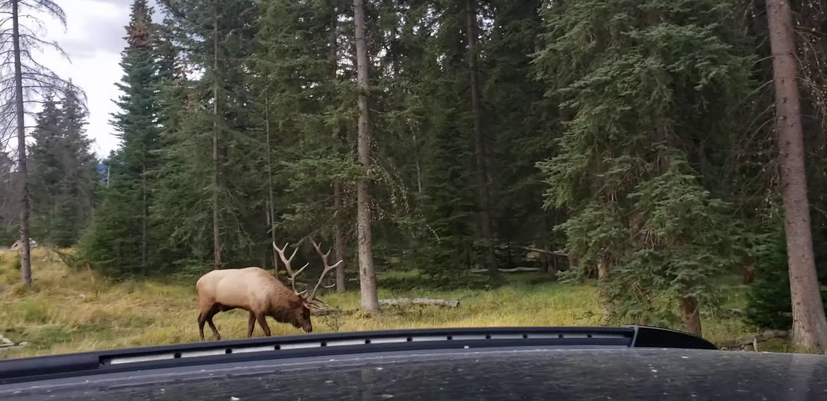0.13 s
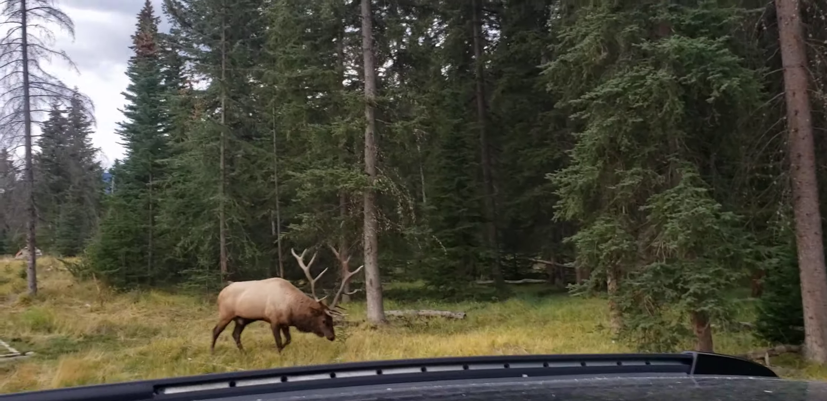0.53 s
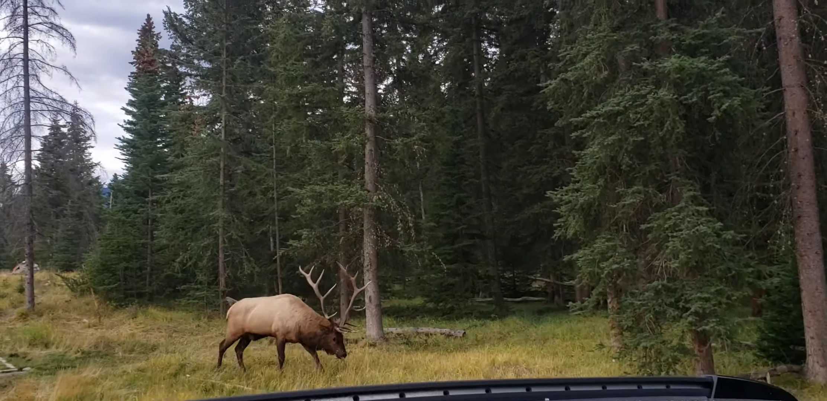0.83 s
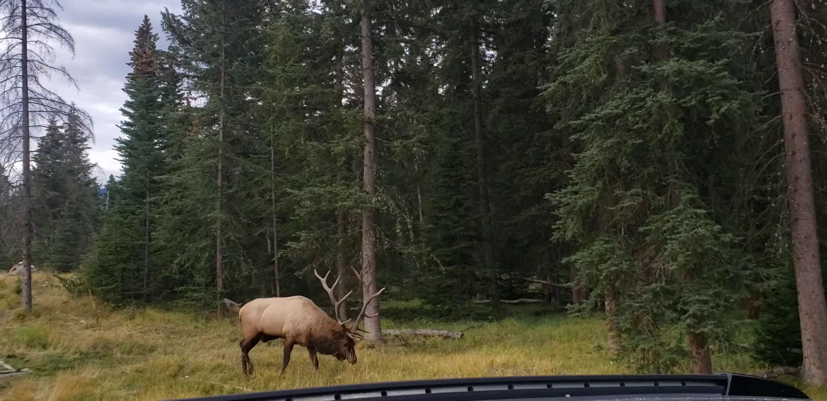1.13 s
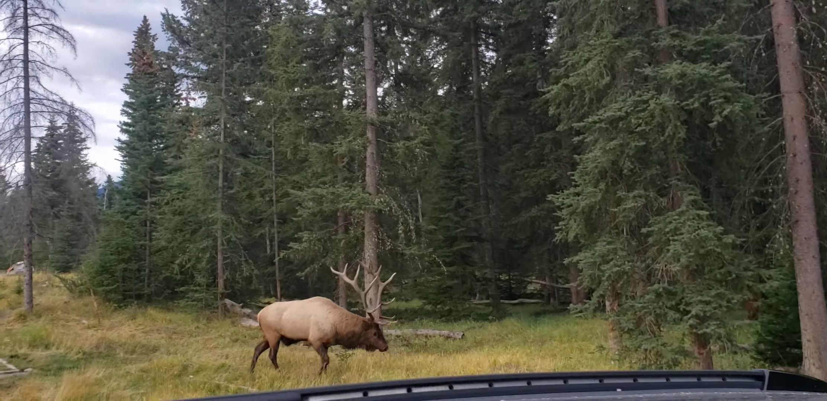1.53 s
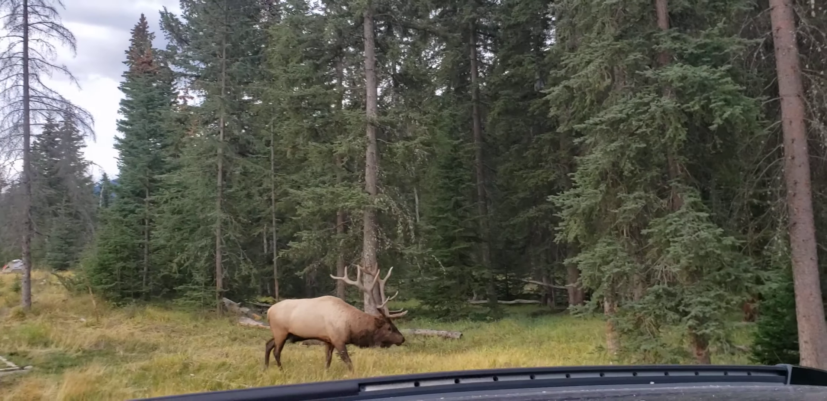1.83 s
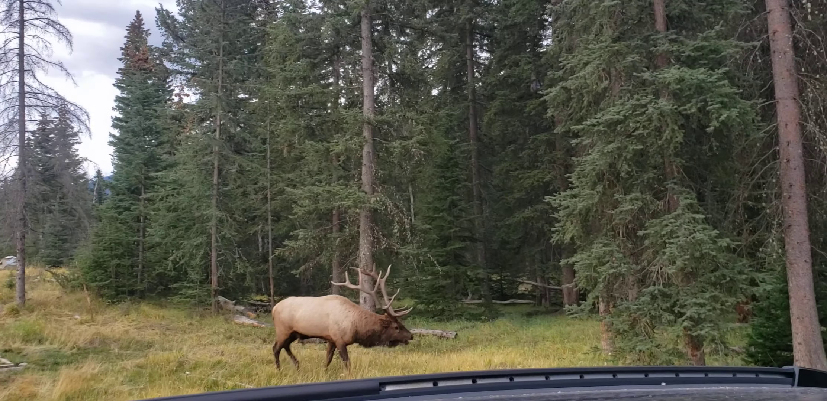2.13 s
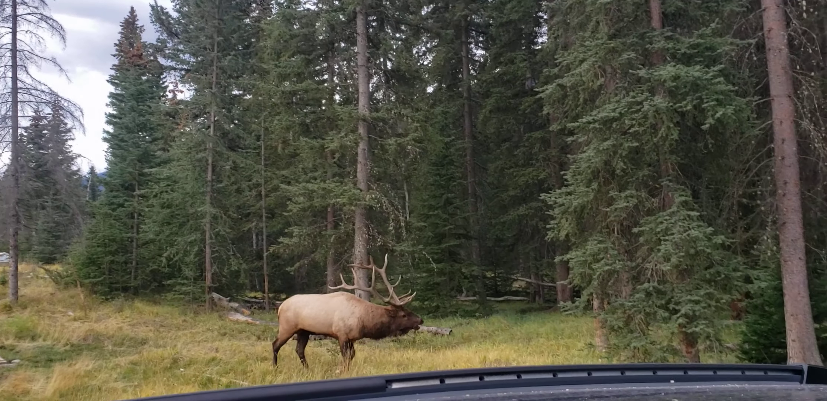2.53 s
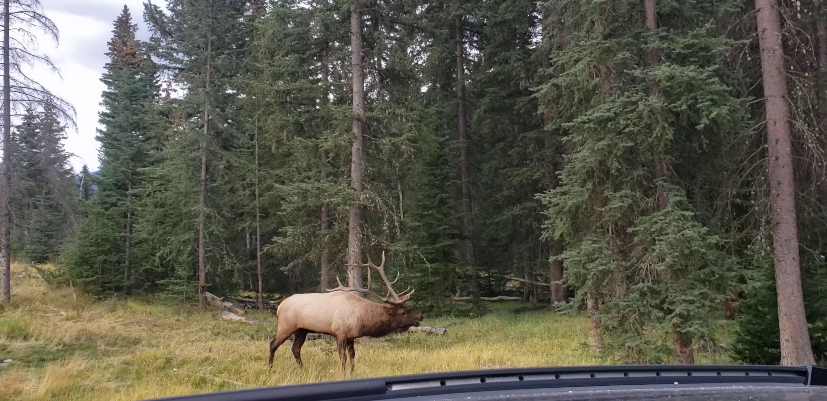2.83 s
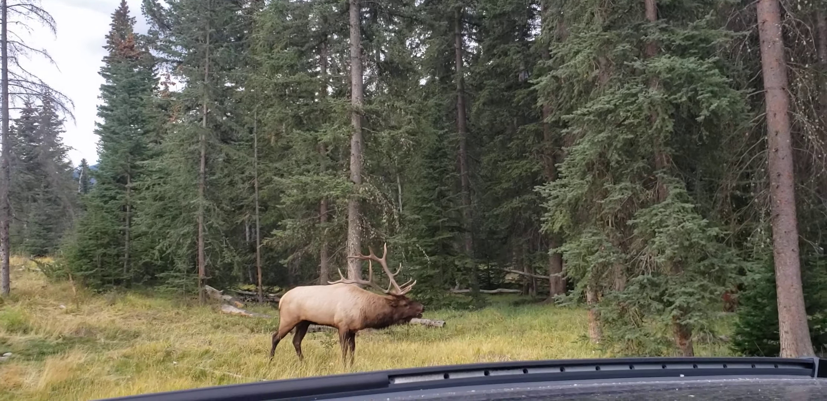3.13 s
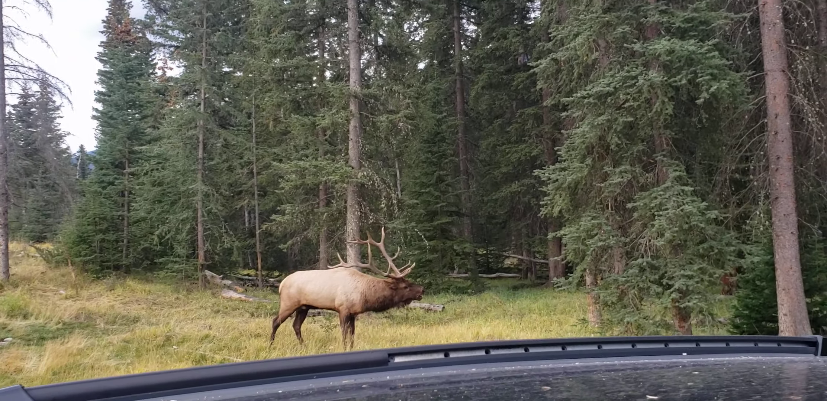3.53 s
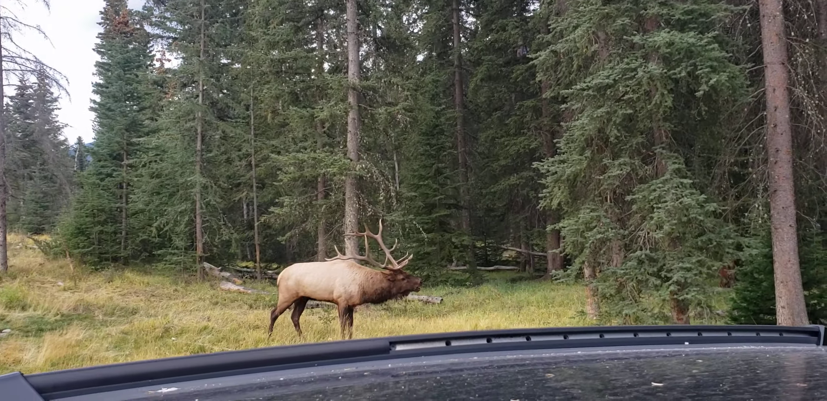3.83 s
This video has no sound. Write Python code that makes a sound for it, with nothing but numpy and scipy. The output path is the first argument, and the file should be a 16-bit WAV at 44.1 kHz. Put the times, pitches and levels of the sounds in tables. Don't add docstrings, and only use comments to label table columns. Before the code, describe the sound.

A bull elk bugles in a forest clearing, heard from an idling car on a handheld phone. Low engine drone and faint forest hush run throughout. Wind thumps come at 0.1-0.4 s, a sharp tap on the phone at 0.57, grassy rustles and clicks until 2.6. From 2.05 a hoarse whistle climbs in steps, cracks at 2.7 into a loud, rapidly pulsing shrill roar with tree echo, and clears to whistle near 4.

```python
import sys
import numpy as np
from scipy import signal
from scipy.io import wavfile
from scipy.ndimage import uniform_filter1d

SR = 44100
rng = np.random.default_rng(int(sys.argv[2]) if len(sys.argv) > 2 else 0)


def to_linear_factor(level_db):
    exponent = np.asarray(level_db, float) / 20
    return 10 ** exponent


def file_out(sig):
    cols = np.atleast_2d(sig).T
    lim = np.clip(cols, -1, 1)
    pcm = np.round(lim * 32767).astype(np.int16)
    wavfile.write(sys.argv[1], SR, pcm)


N = 176400
ELK_PAN_DB, ELK_LAG_S = 1.5, .00004


def level(x, db=0):
    return x * to_linear_factor(db) / np.sqrt(np.mean(x ** 2))


def peak(x):
    return x / np.max(np.abs(x))


def curve(table, col):
    a = np.array(table, float)
    return np.interp(np.arange(N) / SR, a[:, 0], a[:, col])


def inside(table, fade=.006):
    t = np.arange(N) / SR
    return np.clip(np.minimum(t - table[0][0], table[-1][0] + fade - t) / fade, 0, 1)


def band(x, hz, width_hz, order=1):
    edges = np.clip([hz - width_hz / 2, hz + width_hz / 2], 10, .49 * SR)
    return signal.sosfilt(signal.butter(order, edges, "band", fs=SR, output="sos"), x)


def body(x, table, order=1):
    return sum((-1) ** k * to_linear_factor(db) * band(x, hz, w, order=order) for k, (hz, w, db) in enumerate(table))


def walk(rate):
    k = max(int(SR / rate), 2)
    return level(uniform_filter1d(uniform_filter1d(rng.standard_normal(N), k), k))


def pair(x, pan_db, lag_s):
    late = np.interp(np.arange(N) - lag_s * SR, np.arange(N), x)
    return np.array([x * to_linear_factor(pan_db / 2), late * to_linear_factor(-pan_db / 2)])


def pipe(hz, overtones_db, blur=0):
    phase = 2 * np.pi * np.cumsum(hz) / SR
    overtones = sum(to_linear_factor(db) * np.sin((k + 2) * phase + blur) for k, db in enumerate(overtones_db))
    return np.sqrt(2) * np.sin(phase), overtones


# (t/s, level/dB)
HISS_DB = [(0, -77), (.14, -84), (.18, -67), (.21, -81), (.52, -83), (.62, -81), (1.11, -85), (1.31, -78.5),
           (1.36, -81.5), (2.5, -84.5), (2.57, -76), (2.78, -83), (2.83, -84), (4, -82.5)]


def hiss():
    n = rng.standard_normal((2, N))
    colour = band(n, 12600, 5000, order=2) + 0.39 * band(n, 11000, 9000)
    return level(colour) * to_linear_factor(curve(HISS_DB, 1) + 1.5 * walk(30))


# (f/Hz, level/dB per Hz)
HUSH = [(200, 2), (600, 5), (1000, 6), (1600, -7.5), (2400, -18.5), (3200, -49), (7000, -28), (8500, -48)]


def hush():
    out, swell, a = 0, walk(1.0), np.array(HUSH)
    for hz in 200 * 2 ** np.arange(0, 5.4, .4):
        shared, own = rng.standard_normal(N), rng.standard_normal((2, N))
        mix = pair(shared, 3.2, -.00043) + min(0.6 + hz / 2500.0, 3) * own
        density_db = np.interp(np.log(hz), np.log(a[:, 0]), a[:, 1])
        db = density_db + 10 * np.log10(hz) + 0.13 * swell + 3.0 * walk(30)
        out = out + to_linear_factor(db) * level(band(mix, hz, hz * 0.34, order=2))
    return level(out, -54.5)


# (f/Hz, width/Hz, level/dB)
RUMBLE = [(49, 14.85, 1), (74.6, 31, -2.5), (103, 10.4, -1.5), (154, 37, -20)]
# (t/s, level/dB)
RUMBLE_DB = [(0, -45), (.44, -44), (.5, -49), (.92, -53), (1.5, -52), (2.3, -50.5), (3.15, -49.5),
             (4, -52.5)]


def rumble():
    mid, side = (body(rng.standard_normal(N), RUMBLE) for _ in range(2))
    both = pair(mid, 1.0, 0) + .6 * side * np.array([[1], [-1]])
    return level(both) * to_linear_factor(curve(RUMBLE_DB, 1) + 5.0 + 0.62 * walk(36))


# (t/s, grass level/dB, cloth level/dB)
RUSTLE = [(0, -43, -58), (.12, -65, -83.5), (.3, -55.5, -72), (.47, -73, -79.5), (.62, -64, -69.5),
          (.8, -63.5, -72), (.95, -83, -93), (1.3, -86, -84.5), (1.4, -52, -78), (1.5, -62, -80),
          (1.75, -54.5, -73), (1.85, -64.5, -90), (2.08, -74, -92), (2.16, -62.5, -79), (2.75, -54.5, -78)]


def rustle():
    grain_size = to_linear_factor(np.minimum(5.2 * rng.exponential(size=N), 10))
    grains = rng.standard_normal((2, N)) * grain_size * (rng.random(N) < .08)
    grass = band(grains + 0.11 * grains[::-1], 1200, 940, order=2)
    rubbing = rng.standard_normal((2, N)) * to_linear_factor(2.0 * walk(40))
    cloth = band(rubbing, 4450, 1500, order=2) + 0.5 * band(rubbing, 6900, 1300, order=2)
    both = level(grass) * to_linear_factor(curve(RUSTLE, 1)) + level(cloth) * to_linear_factor(curve(RUSTLE, 2))
    return both * inside(RUSTLE, fade=0.057)


# (t/s, peak level/dB, f/Hz)
THUMPS = [
    (.13, -37, 54),
    (0.195, -35.5, 90),
    (0.286, -36, 57),
    (0.338, -38, 68),
    (0.392, -30, 103),
    (0.425, -33, 62.4),
]


def thumps():
    out, t = np.zeros((2, N + 4410)), np.arange(4410) / SR
    for s, db, hz in THUMPS:
        u = (t - .05) * hz
        swing = 1.98 * np.sin(2 * np.pi * u) * np.exp(-(u / 0.37) ** 2)
        out[:, int((s - .05) * SR):][:, :len(t)] -= to_linear_factor(db) * swing * to_linear_factor([[5.5], [-9]])
    return out[:, :N]


# (t/s, peak level/dB, ring f/Hz,
# crackle level/dB re ring)
CLICKS = [(0.254, -44, 1160, -14), (0.349, -38, 1140, -15), (0.5738, -39.5, 1780, -22),
          (.579, -56, 1700, -10), (0.5943, -43, 1460, -26), (.76, -51, 1640, -20),
          (0.789, -47.5, 1550, -16), (1.278, -45, 880, -28), (1.39, -34.5, 1140, -23),
          (1.415, -39.5, 1250, -21), (1.444, -42.5, 1280, -11), (1.544, -42, 1220, -11),
          (1.638, -36.5, 1230, -11), (1.667, -40.5, 1240, -9), (1.706, -39, 1340, -29),
          (1.765, -35.5, 1190, -20), (2.153, -43, 696, -10), (2.326, -40, 750, -30),
          (2.597, -36.5, 940, -21), (2.63, -43, 1100, -38)]


def clicks():
    out, t = np.zeros((2, N + 4410)), np.arange(4410) / SR
    noises = rng.standard_normal((len(CLICKS), len(t)))
    for (s, db, hz, top_db), noise in zip(CLICKS, noises):
        burst = (noise + 12 * (t == 0)) * to_linear_factor(-60 * t / 0.019)
        ring = peak(band(burst, hz, 620, order=2))
        crackle = peak(band(burst, 4200, 3400, order=2))
        click = ring + to_linear_factor(top_db) * crackle
        out[:, int(s * SR):][:, :len(t)] += to_linear_factor(db) * click * to_linear_factor([[2.2], [-2.2]])
    return out[:, :N]


# (f/Hz, width/Hz, level/dB, t60/s)
SNAP = [(194, 150, -11.5, 0.025), (463, 630, 1, 0.024), (1700, 630, -1.5, 0.026), (4180, 940, -4.5, 0.015),
        (10900, 5000, -38, 0.022)]


def snap():
    snap_s, snap_db = .5722, -23
    t = np.arange(N) / SR - snap_s
    hit = (np.arange(N) == int(snap_s * SR)) * 45 + rng.standard_normal(N) * (t > 0)
    sound = 0
    for hz, width, db, t60 in SNAP:
        ring = band(hit * to_linear_factor(-60 * np.abs(t) / t60), hz, width, order=2)
        sound = sound + peak(ring) * to_linear_factor(db)
    return to_linear_factor(snap_db) * peak(sound) * to_linear_factor([[-.7], [.7]])


def echo(x):
    echo_db, t60_s, own_share = -7, .32, .9
    t = np.arange(int(.4 * SR)) / SR
    tails = rng.standard_normal(len(t)) + own_share * rng.standard_normal((2, len(t)))
    tails = tails * to_linear_factor([[ELK_PAN_DB / 2], [-ELK_PAN_DB / 2]])
    tails = tails * to_linear_factor(-60 * t / t60_s) * (t > .008)
    tails = tails / np.sqrt(np.sum(tails[0] ** 2))
    return to_linear_factor(echo_db) * signal.fftconvolve(x[None], tails, axes=1)[:, :N]


# (t/s, f/Hz, level/dB, overtone level/dB)
START = [(2.05, 757, -72, -78), (2.075, 702.6, -56, -70), (2.114, 751, -49.5, -72),
         (2.148, 834, -62.5, -60), (2.2, 973, -46.5, -63), (2.245, 1051, -36.5, -68),
         (2.258, 1020, -39.5, -60), (2.268, 1170, -75, -65.5)]
CLIMB = [(2.269, 1200, -67, -64), (2.299, 1266, -50, -63), (2.319, 1370, -56, -59),
         (2.345, 1542, -49.5, -64), (2.364, 1593, -39, -62.5), (2.407, 1811, -46.5, -67.5),
         (2.437, 1805, -47, -69)]
HOLD = [(2.435, 1760, -50.5, -74), (2.463, 1678, -35.5, -66.5), (2.5, 1760, -38.5, -69),
        (2.542, 1813, -36.5, -69.5), (2.575, 1904, -46, -72), (2.632, 1997, -43, -67),
        (2.69, 2043, -42, -51), (2.711, 2100, -40, -52), (2.722, 2240, -71, -68)]
CLOSE = [
    (3.963, 2173, -44, -62),
    (3.985, 2169, -26.5, -44),
    (4.0, 2150, -27.5, -44),
]
OVERTONES_DB = [6.5, -16.5, -19]
# (f/Hz, width/Hz, level/dB)
MOUTH = [(2500, 830, -3), (4055, 1100, -9), (6050, 500, 9), (7050, 810, 8)]
# (f/Hz, width/Hz, level/dB)
LINGER = [(735, 16, -8), (1035, 24, -12), (1270, 9, 8), (1590, 18, -3), (1740, 22, -12)]
# (t/s, f/Hz, level/dB)
MOAN = [(2.09, 688, -62), (2.15, 597, -56), (2.22, 548, -57), (2.26, 558, -70)]
# (t/s, level/dB)
CRACK = [
    (2.712, -74),
    (2.74, -64.5),
    (2.79, -58.5),
    (2.815, -72.5),
]
# (f/Hz, width/Hz, level/dB)
CRACK_BANDS = [(2840, 440, -1.5), (4300, 1300, -1.5), (6600, 800, -2.5)]


def whistle():
    out, over = 0, 0
    for part in (START, CLIMB, HOLD, CLOSE):
        unsteady = 1 + .006 * walk(120) + .005 * walk(430)
        hz = uniform_filter1d(curve(part, 1), size=300) * unsteady
        tone, upper = pipe(hz, OVERTONES_DB, blur=1.1 * walk(250))
        out = out + tone * to_linear_factor(curve(part, 2) + 2.0 * walk(42)) * inside(part, fade=0.0036)
        over = over + upper * to_linear_factor(curve(part, 3) + 3.75 * walk(90)) * inside(part, fade=.01)
    moan, _ = pipe(curve(MOAN, 1) * (1 + 0.0835 * walk(185)), [-20])
    moan = moan * to_linear_factor(curve(MOAN, 2) + 3.0 * walk(60)) * inside(MOAN)
    crack = level(body(rng.standard_normal(N), CRACK_BANDS, order=2))
    crack = crack * to_linear_factor(curve(CRACK, 1)) * inside(CRACK)
    return out + body(out, LINGER) + body(over, MOUTH, order=2) + moan + crack


# (t/s, growl f/Hz, swept whistle level/dB, chest level/dB, sweep centre f/Hz, sweep width/Hz, roughness 0-1)
ROAR = [(2.712, 95.5, -31.5, -64, 2314, 499.6, .9), (2.735, 94.1, -47.5, -69, 2134, 675, 0.7),
        (2.755, 90, -35.5, -55, 1700, 453, .45), (2.85, 82.53, -32, -44, 1836, 895, 0.14),
        (3.11, 80.7, -30.5, -39.5, 1890, 1101, 0.17), (3.4, 83.52, -29, -39, 1973, 1102, .16),
        (3.7, 84.34, -28, -42.5, 2040, 1115, 0.1), (3.77, 87.97, -31, -47.5, 1974, 1200, 0.34),
        (3.83, 89.7, -31, -40, 2016, 1418, .25), (3.955, 89.13, -32.5, -44, 2116, 1923, .35),
        (3.985, 88.5, -35.5, -54, 2142, 598, 0.2)]
ROAR_OVERTONES_DB = [-3, -2.5, 0]
# (f/Hz, width/Hz, level/dB, left minus right/dB)
THROAT = [(1397.6, 41.6, 2, 7.5), (1730, 67, -0.5, 6.5), (2102, 101, 0, 1.5), (2427, 110, -4, -4.5),
          (2678, 29, -10, -5), (2930, 75, -13, 4)]
# (f/Hz, width/Hz, level/dB)
UPPER_THROAT = [(3754, 150, -23), (5750, 420, -36), (6360, 580, -48), (7360, 600, -40), (3370, 500, -41.5)]
# (f/Hz, width/Hz, level/dB)
EDGES = [(1130, 92, 7), (2710, 200, -5.5), (2975, 95, -8)]
# (t/s, level/dB)
OPENING = [(2.72, -17), (2.78, -8.5), (2.83, -30.5), (3.76, -33.5), (3.84, -15), (3.95, -10.5),
           (3.98, -18.5)]
# (t/s, level/dB)
RIDGE = [(2.75, -22), (3.1, -20), (3.4, -18.5), (3.8, -19), (3.9, -25.5), (4, -33)]
# (f/Hz, width/Hz, level/dB)
CHEST = [(90, 23, -1), (159, 41, -0.5), (270, 83, -9.5), (412, 110, -7.5), (533.6, 87, -3.5),
         (636.5, 70.7, 2.5), (918, 94, -3)]
# (t/s, level/dB)
DEEP = [(2.7, -4.5), (3.3, -2.5), (3.5, 4), (3.75, 8.5), (3.85, 2.5)]


def roar():
    open_share = .72
    rough, on = np.clip(curve(ROAR, 6), 0, 1), inside(ROAR, fade=.02)
    cycles = np.cumsum(curve(ROAR, 1) * (1 + 0.095 * rough * walk(60))) / SR
    phase, index = cycles % 1, cycles.astype(int)
    chance = rng.standard_normal((N // 100, 2))[index].T
    sweep = phase / open_share - .5 + .2 * rough * chance[0] + .15 * rough * walk(500)
    hz = curve(ROAR, 4) + curve(ROAR, 5) * sweep
    gate = np.sin(np.pi * np.clip(phase / open_share, 0, 1) ** 0.76) + 0.15 + .9 * rough
    size = to_linear_factor(3.5 * rough * chance[1])
    tone, upper = pipe(uniform_filter1d(hz, size=40), ROAR_OVERTONES_DB)
    breath = to_linear_factor(-26) * (3 + 12 * rough ** 2) * rng.standard_normal(N)

    voiced = (tone + breath) * gate * size
    steep = band(voiced, 2200, 2100, order=2)
    low = 0
    for k, (f, w, db, pan_db) in enumerate(THROAT):
        low = low + (-1) ** k * to_linear_factor(db) * pair(band(steep, f, w), pan_db, ELK_LAG_S)
    low = low + to_linear_factor(curve(OPENING, 1)) * pair(body(voiced, EDGES, order=2), ELK_PAN_DB, ELK_LAG_S)

    bright = (upper + breath) * gate * size
    ridge = to_linear_factor(curve(RIDGE, 1)) * band(bright, 4217, 267, order=2)
    high = body(bright, UPPER_THROAT, order=2) - ridge

    noise = to_linear_factor(-62.0) * rough * rng.standard_normal(N) * np.exp(-phase / .4)
    pulses = np.diff(index, prepend=0) * size + noise
    chest = -to_linear_factor(curve(DEEP, 1)) * body(pulses, CHEST[:3])
    for k, row in enumerate(CHEST[3:]):
        unsteady = to_linear_factor(1.0 * walk(8.9) + 2.1 * walk(40))
        chest = chest + (-1) ** k * body(pulses, [row], order=2) * unsteady
    chest = band(chest, 632, 1154, order=2)

    def rms(v):
        return np.sqrt(np.mean((v * on) ** 2) / np.mean(on ** 2))

    gain = on * to_linear_factor(curve(ROAR, 2)) / rms(low)
    brighten_db = 6.0 + 0.0349 * (curve(ROAR, 4) - 1938.5)
    return low * gain, on * chest / rms(chest) * to_linear_factor(curve(ROAR, 3)), high * gain * to_linear_factor(brighten_db)


def scene():
    throat, chest, high = roar()
    low = chest + whistle()
    direct = throat + pair(low, ELK_PAN_DB, ELK_LAG_S) + pair(high, 4.6, .000085)
    call = direct + echo(throat.mean(axis=0) + low + high)
    air = call + hush() + rumble() + rustle() + clicks() + thumps()
    dulled = signal.sosfilt(signal.butter(10, 7900, fs=SR, output="sos"), air)
    return dulled + snap() + hiss()


def band_limit(x):
    return signal.sosfilt(signal.butter(12, 15750, fs=SR, output="sos"), x)


def record(dry):
    cut = signal.sosfilt(signal.butter(2, 38, "high", fs=SR, output="sos"), dry)
    return band_limit(cut)


dry = scene()
out = record(dry)
file_out(out)
```